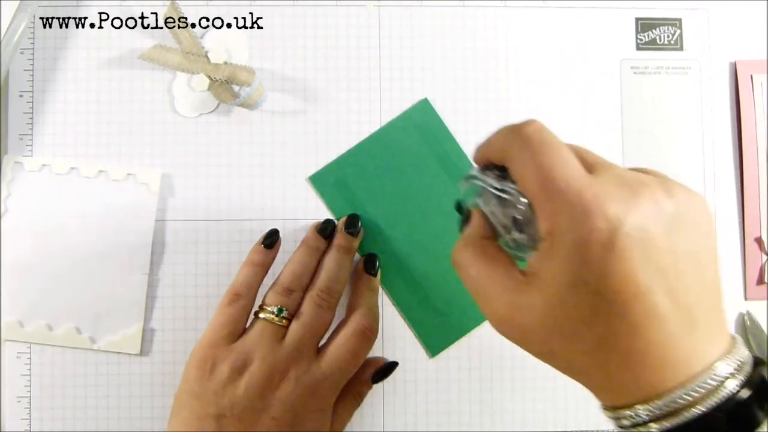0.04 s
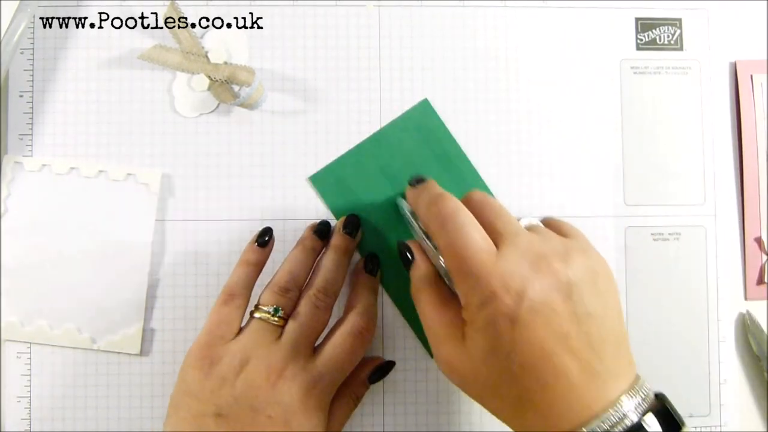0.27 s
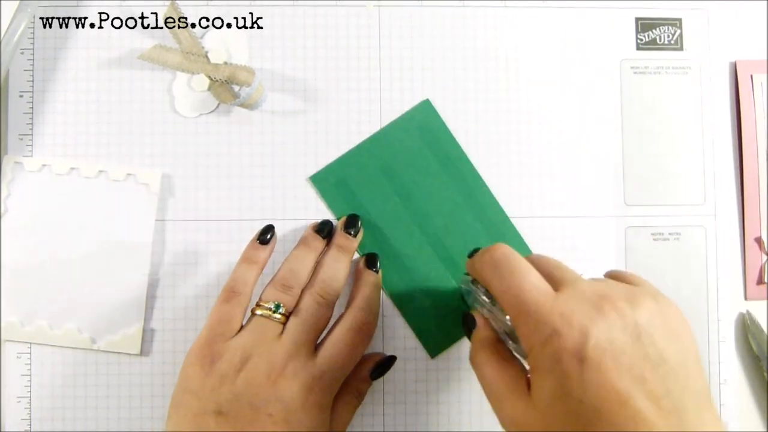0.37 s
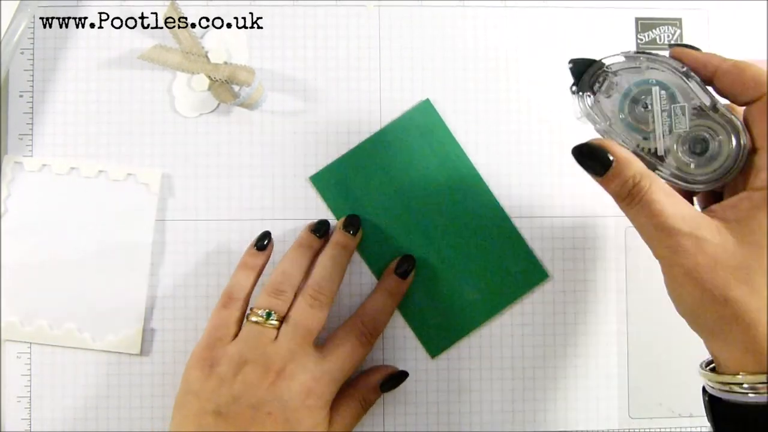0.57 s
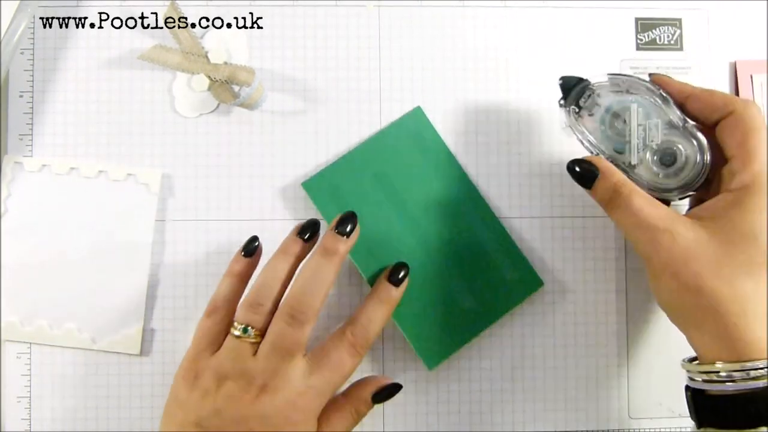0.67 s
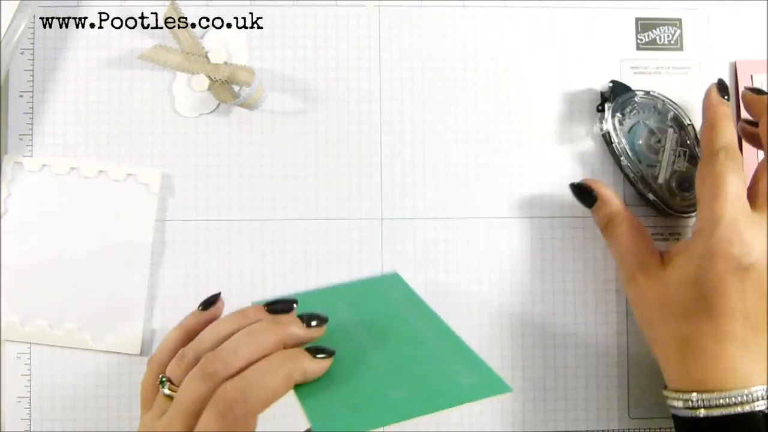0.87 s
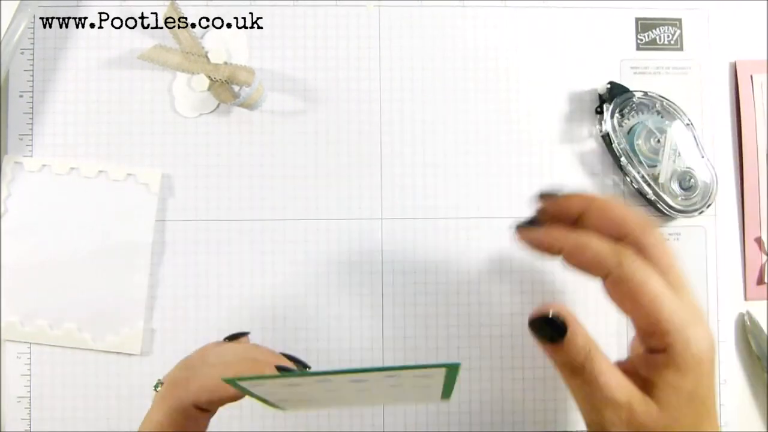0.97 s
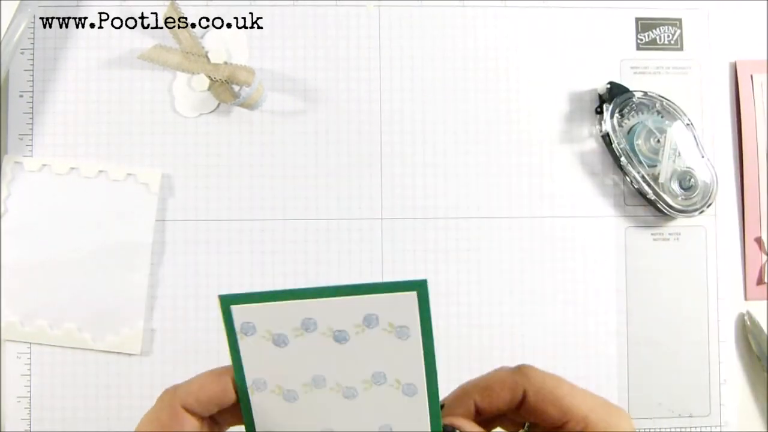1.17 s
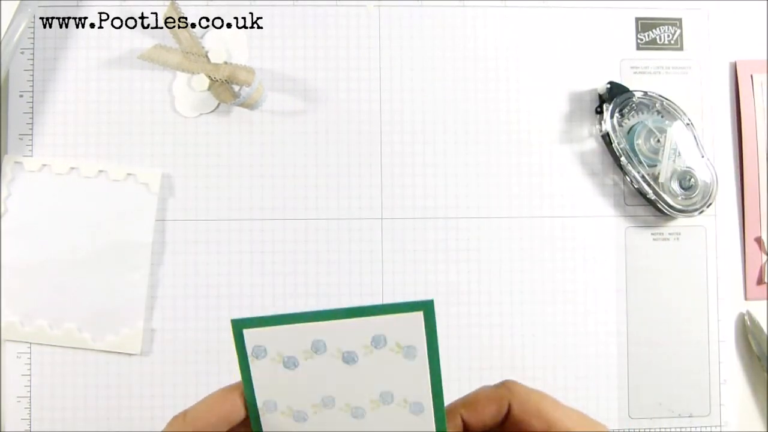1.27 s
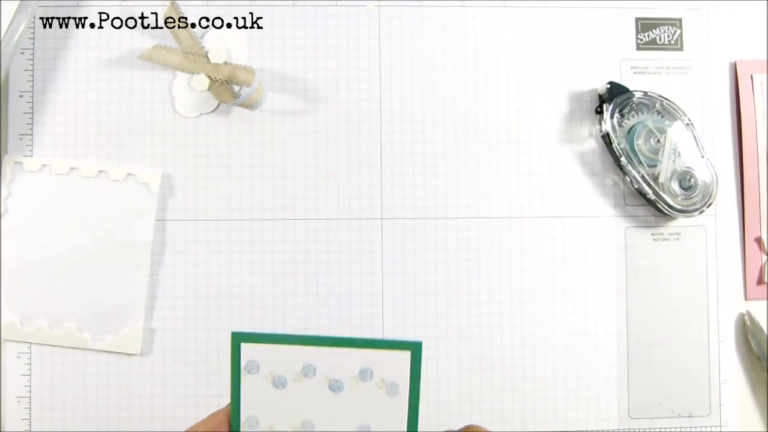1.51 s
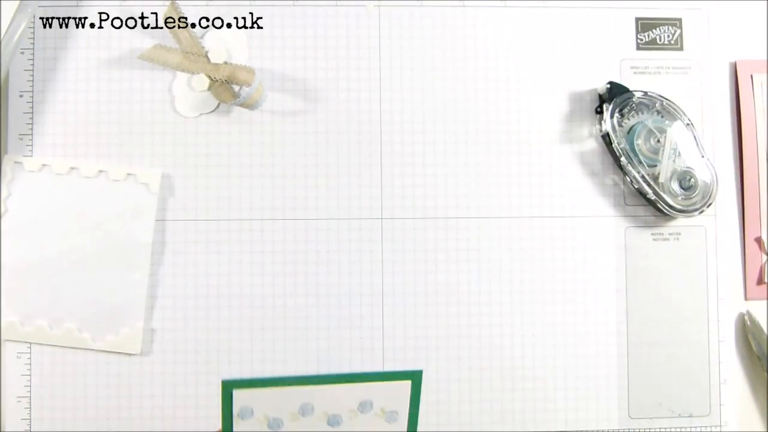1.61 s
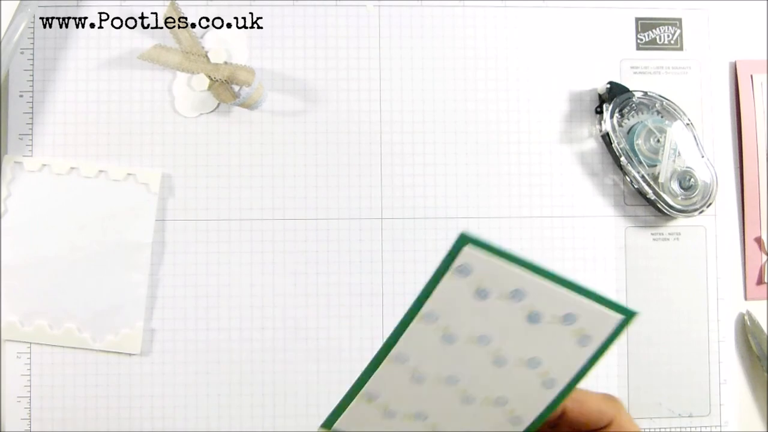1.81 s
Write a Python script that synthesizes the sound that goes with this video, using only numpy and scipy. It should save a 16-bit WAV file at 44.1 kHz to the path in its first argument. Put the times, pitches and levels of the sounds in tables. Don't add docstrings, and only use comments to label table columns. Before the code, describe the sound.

A plastic adhesive tape runner clacks onto card, zips with a short ratcheting buzz, lifts with small clicks and is set down in two hard knocks; then card snaps and rustles, close up in a small room.

```python
import sys
import numpy as np
from scipy import signal
from scipy.fft import rfft, irfft
from scipy.io import wavfile
from scipy.ndimage import uniform_filter1d

SR = 44100
rng = np.random.default_rng(int(sys.argv[2]) if len(sys.argv) > 2 else 0)


def linear_from_db(decibels):
    return 10 ** (np.asarray(decibels, float) / 20)


def wav_out(sig):
    wavfile.write(sys.argv[1], SR, np.round(np.clip(np.atleast_2d(sig).T, -1, 1) * 32767).astype(np.int16))


N = 81585


def unit(x):
    return x / np.sqrt(np.mean(x ** 2))


def band(x, hz, width_hz):
    return signal.lfilter(*signal.iirpeak(min(hz, .45 * SR), hz / width_hz, SR), x)


def grit(spread_db):
    size_db = spread_db * np.minimum(rng.exponential(size=N), 3.5)
    return unit(rng.standard_normal(N) * linear_from_db(size_db))


def decay(start, t60, rise=1e-5):
    since = np.arange(N) / SR - start
    fall = np.exp(-np.log(1000) * np.maximum(since, 0) / max(t60, .002))
    return np.clip(since / rise, 0, 1) * fall


def strike(start):
    return 1. * (np.arange(N) == int(start * SR))


def swell(start, length, power=1):
    t = np.arange(N) / SR
    return np.sin(np.pi * np.clip((t - start) / length, 0, 1) ** power)


def modes(table):
    t = np.arange(N) / SR
    return sum(linear_from_db(db) * np.sin(2 * np.pi * hz * t) * decay(0, t60) for hz, db, t60 in table)


def wide(a, b):
    treble = signal.lfilter(*signal.butter(1, 6600, "high", fs=SR), b)
    mids = signal.lfilter(*signal.butter(3, 930, "high", fs=SR), b)
    side = treble + linear_from_db(-21) * b + linear_from_db(-18.5) * mids
    return np.array([a + side, a - side])


# (frequency [Hz], level [dB per Hz])
HISS_COLOUR = [(18, -41), (30, -4), (355, -6.5), (780, -11.5), (1460, -11.5), (2060, -16.5), (6380, -20),
               (9970, -22.5), (16000, -30)]
# (frequency [Hz], width [Hz], level [dB])
HUMS = [(170.4, 5.8, -69), (107.4, 30, -71.5), (65, 2.7, -70)]
# (time [s], level [dB])
HUM_SWELL = [
    (0, 1.5),
    (.14, 1.5),
    (.2, -2),
    (.9, -10),
    (1.05, 12.5),
    (1.17, 7),
    (1.3, 2),
    (1.5, 8),
    (1.58, -10.5),
    (1.85, -0.5),
]


def tone():
    t, freq = np.arange(N) / SR, np.fft.rfftfreq(N, 1 / SR)
    hz, db = np.array(HISS_COLOUR).T
    shape = linear_from_db(np.interp(np.log(freq + 1), np.log(hz), db))
    side_gain = linear_from_db(np.array([[0], [7.5]]))
    noise = wide(*rng.standard_normal((2, N)) * side_gain)
    hiss = linear_from_db(-59.5) * unit(irfft(rfft(noise) * shape, N))
    hums = []
    for hz, width_hz, db in HUMS:
        waver = unit(band(rng.standard_normal(N), hz, width_hz))
        hums.append(linear_from_db(db) * (np.sin(2 * np.pi * hz * t) + 0.2 * waver))
    swelling = hums[0] * linear_from_db(np.interp(t, *np.array(HUM_SWELL).T))
    return hiss + swelling + sum(hums[1:])


def room(x):
    t = np.arange(SR // 2) / SR
    low_t60_s, high_t60_s, early_s = 0.34, 0.35, 0.011
    tail = wide(*rng.standard_normal((2, len(t))))
    low = signal.lfilter(*signal.butter(1, 3000, fs=SR), tail)
    late = low * np.exp(-np.log(1000) * t / low_t60_s)
    late = late + (tail - low) * np.exp(-np.log(1000) * t / high_t60_s)
    early = wide(*rng.standard_normal((2, len(t))))
    early = early * np.exp(-t / early_s) * np.clip(t / 0.0048, 0, 1)
    answer = linear_from_db(-8) * unit(late) * np.clip(t / 0.05, 0, 1) + linear_from_db(-6.5) * unit(early)
    return signal.fftconvolve(x[None], answer / np.sqrt(len(t)), axes=1)[:, :N]


def ports(x):
    scatter_s, scatter_db, shift_hz = .008, -1, 7
    t = np.arange(SR // 30) / SR
    turn = 2 * np.pi * shift_hz * np.arange(N) / SR
    smear = rng.standard_normal((2, len(t))) * np.exp(-t / scatter_s)
    a, b = signal.fftconvolve(x[None], smear / np.linalg.norm(smear[0]), axes=1)[:, :N]
    return wide(x, linear_from_db(scatter_db) * (a * np.cos(turn) + b * np.sin(turn)))


# (time [s], level [dB], push length [s])
THUMPS = [
    (0.189, -31.5, 0.0053),
    (0.324, -32.5, 0.0035),
    (0.389, -38.5, 0.0035),
    (.563, -35, 0.005),
    (0.639, -55, 0.0016),
    (0.747, -39, 0.0033),
    (0.834, -34, 0.0046),
    (0.842, -28, 0.0078),
    (0.916, -44, 0.0042),
]
# (frequency [Hz], level [dB], 60 dB fade [s])
TABLE_MODES = [(87.4, -8, 0.49), (168.5, -1.5, 0.268), (262, 4, 0.11), (378, -14, .06), (72, -8.5, 0.12)]


def table():
    push = 0
    for start, db, length in THUMPS:
        push = push + linear_from_db(db) * swell(start, length) / (length * SR)
    return signal.fftconvolve(push, modes(TABLE_MODES))[:N]


# (time [s], peak level [dB], centre [Hz], 60 dB rattle fade [s])
FLICKS = [
    (1.221, -36.5, 2550, 0.043),
    (1.329, -14.5, 2860, 0.037),
    (1.449, -35, 2260, 0.094),
    (1.562, -26.5, 2315, 0.1),
    (1.588, -38, 2530, 0.055),
]
# (start [s], length [s], level [dB], centre [Hz], width [Hz])
RUBS = [(-.1, 0.17, -58.5, 2200, 3740), (0.228, 0.042, -46.5, 3000, 5900), (0.56, 0.03, -59, 6000, 9000),
        (0.62, 0.041, -63, 1990, 1500), (0.85, 0.083, -53.5, 4000, 3700), (1.07, 0.14, -70.5, 5000, 7860),
        (1.153, 0.084, -62, 2110, 1970), (1.187, 0.068, -60.5, 7940, 5000), (1.189, 0.055, -56, 955, 700),
        (1.348, 0.1, -65.5, 3930, 7900), (1.734, 0.12, -62.5, 8000, 11800)]


def card():
    snap_lag_s, out, rattle = .0015, 0, grit(6.5)
    for start, db, hz, t60 in FLICKS:
        snap = linear_from_db(db + 4) * strike(start + snap_lag_s)
        hit = linear_from_db(db - 11) * rattle * decay(start + snap_lag_s, t60) + snap
        out = out + band(hit, hz, hz * 2.25)
    hiss = grit(5)
    for start, length, db, hz, width_hz in RUBS:
        stroke = np.abs(swell(start, length, 0.64) ** 1.12)
        out = out + linear_from_db(db + 10.5) * band(hiss * stroke, hz, width_hz)
    return out


# (time [s], click level [dB], low sheet level [dB], high sheet level [dB])
TICKS = [(0.2418, -25, -31, -51), (0.5432, -29, -63, -43), (0.5612, -29.5, -46, -40),
         (0.6371, -25, -41, -40), (0.68, -38, -46.5, -48), (0.7453, -12, -40, -28.5),
         (0.7536, -16, -35, -27.5), (0.8353, -22, -32, -23.5), (1.2229, -29, -35, -38.5),
         (1.258, -56, -62, -50), (1.3303, -16.5, -42, -32), (1.3368, -15.5, -41.5, -32),
         (1.451, -47, -40.5, -37.5), (1.546, -58.5, -68, -51), (1.5636, -23, -29, -27),
         (1.5657, -33, -29.5, -36), (1.572, -42, -35, -46), (1.5882, -35, -44, -44.5)]
# (frequency [Hz], level [dB], 60 dB fade [s])
SHEET_LOW = [(388, -7.5, 0.048), (520, -11, 0.034), (900, -6, 0.022), (1055, -7.5, .02), (1430, -11, .03)]
# (frequency [Hz], level [dB], 60 dB fade [s])
SHEET_HIGH = [(1848, -9.5, .02), (2504, -7.5, .02), (2732, -9, .02), (3353, -5, .02), (5270, -13.5, .015)]


def ticks():
    click, low, high = (sum(linear_from_db(row[k]) * strike(row[0]) for row in TICKS) for k in range(1, 4))
    out = linear_from_db(7) * band(click, 6000, 7600)
    out = out + signal.fftconvolve(low, modes(SHEET_LOW))[:N]
    out = out + signal.fftconvolve(high, modes(SHEET_HIGH))[:N]
    return signal.lfilter(*signal.butter(2, 410, "high", fs=SR), out)


RISE_S = 0.0023
# (time [s], level [dB], frequency [Hz], width [Hz], 60 dB shaking fade [s])
RINGS = [(.186, -28.5, 328, 200, 0.068), (1.331, -29, 880, 250, 0.035), (1.564, -26.5, 500, 250, 0.054),
         (0.835, -18, 8200, 1800, 0.054), (0.185, -27, 790, 1400, 0.046), (0.268, -25, 302, 60, 0.11),
         (.31, -16, 254.4, 46.7, 0.067), (.562, -38.5, 780, 292, 0.04), (.637, -45.5, 400, 151, 0.044),
         (.637, -35, 900, 397, 0.024), (.206, -21, 1250, 500, .03), (.241, -16, 1190, 500, 0.019),
         (.251, -26, 1300, 497, 0.024), (.41, -24, 1130, 400, 0.019), (.429, -21.5, 1650, 500, 0.055),
         (.834, -29, 200, 120, 0.069), (.643, -32, 1970, 300, 0.023), (.654, -40, 1980, 300, 0.026),
         (0.573, -42.5, 4550, 496, 0.069), (0.774, -46, 520, 114, 0.038), (1.345, -47.5, 520, 119, 0.41),
         (0.663, -27.5, 2150, 500, 0.016), (0.743, -26.5, 450, 774, 0.16), (0.742, -19, 1800, 200, 0.033),
         (0.745, -11.5, 2070, 198, 0.046), (.834, -20, 414, 710, 0.066), (.835, -14.5, 4910, 800, 0.088),
         (0.908, -30, 4200, 900, .1), (0.983, -32, 2630, 507, 0.035), (0.985, -33, 4260, 704, 0.042),
         (1.047, -32, 2650, 403, 0.036), (1.047, -33.5, 4430, 600, 0.042), (1.2235, -36, 700, 1310, 0.072),
         (1.2218, -29, 2100, 684, 0.032), (1.33, -43, 925, 980, 0.095), (1.333, -21.5, 2380, 900, 0.029),
         (1.45, -36, 1050, 395, .03), (1.451, -37, 2480, 2450, 0.027), (1.563, -29, 1080, 890, 0.069),
         (1.564, -22, 3100, 1300, 0.036)]


def rings():
    shake, out = grit(1), 0
    for start, db, hz, width_hz, t60 in RINGS:
        force = shake * decay(start, t60, RISE_S) + linear_from_db(14) * strike(start)
        ring = band(band(force, hz, 1.01 * width_hz), hz, 1.01 * width_hz)
        out = out + linear_from_db(db) * np.sqrt(SR / 4 / width_hz) * ring / 3
    return out


def patchy():
    k = int(.012 * SR)
    steps = np.repeat(rng.standard_normal(N // k + 1), k)
    return linear_from_db(1.8 * 1.59 * uniform_filter1d(steps, k)[:N])


# (frequency [Hz], width [Hz], level [dB])
CASE = [(1276, 735, 1.5), (1700, 500, 5.5), (3080, 1160, 1.5), (3890, 620, 2.5), (5000, 960, 2.5),
        (6880, 2200, 4), (9000, 2900, 3), (13100, 5300, -2)]


def case(drive, body_drive):
    out = 0
    for k, (hz, width_hz, db) in enumerate(CASE):
        force = patchy() * (body_drive if k < 2 else drive)
        gain = (-1) ** k * linear_from_db(db) * np.sqrt(SR / 4 / width_hz)
        out = out + gain * band(force, hz, width_hz)
    return out / len(CASE)


# (start [s], length [s], level [dB], frequency [Hz], width [Hz])
PRESSES = [
    (0.232, 0.07, 7.5, 3740, 500),
    (0.283, 0.059, -4, 5000, 500),
    (0.288, 0.053, 1.5, 3150, 600),
    (0.302, 0.062, 6.5, 6780, 600),
    (0.338, 0.049, 4, 3680, 497),
    (0.377, 0.044, 0, 2900, 600),
    (.25, 0.082, -7.5, 1330, 351),
    (0.353, 0.034, -7, 1700, 350),
]


def pressed(drive):
    out = 0
    for start, length, db, hz, width_hz in PRESSES:
        gain = linear_from_db(db) * np.sqrt(SR / 4 / width_hz)
        out = out + gain * band(drive * swell(start, length), hz, width_hz)
    return out / len(CASE)


# (time [s], level [dB], ratchet speed [teeth/s], extra hollow body ring [dB])
PULL = [
    (0.242, -26.5, 200, -6),
    (0.257, -25, 167, 1.5),
    (0.292, -16.5, 183, -7),
    (0.328, -15.5, 198, -10),
    (0.36, -18, 205, -9),
    (0.398, -20.5, 242, -5.5),
    (0.43, -24, 182, 0.5),
    (0.451, -41, 250, -11),
]
# (time [s], peak level [dB], body ring [dB], 60 dB rattle fade [s])
KNOCKS = [(0.193, -14, -8.5, 0.16), (0.204, -14, 8.5, 0.029), (0.24, -8, 7.5, 0.021),
          (0.254, -20, -36, 0.07), (0.408, -14.5, 2, 0.091), (0.413, -16, -0.5, 0.073),
          (0.429, -35, -19, 0.026), (0.54, -20, -27, 0.041), (0.546, -26, -44, 0.035),
          (0.561, -38, -23, 0.068), (0.572, -37, -4.5, 0.055), (0.634, -20.5, -21, 0.046),
          (0.643, -34, -3, 0.096), (0.656, -24.5, -25, 0.073), (0.664, -39, 1, 0.019),
          (0.743, -4.5, -11.5, 0.07), (0.751, -17, -15.5, 0.11), (0.771, -14, -25, 0.063),
          (0.832, -25, -15.5, 0.05), (0.835, -3.5, -10, 0.052), (0.905, -29.5, -6, 0.081),
          (0.983, -29.5, -11, 0.071), (1.045, -31.5, -9.5, 0.044)]


def runner():
    t = np.arange(N) / SR
    time, db, speed, body_db = np.array(PULL).T
    gain = linear_from_db(np.interp(t, time, db, left=-120, right=-120))
    teeth_per_s = np.interp(t, time, speed)
    late, uneven = rng.standard_normal((N // 50, 2)).T
    phase = np.cumsum(teeth_per_s) / SR
    phase = phase + .15 * late[phase.astype(int)]
    tooth = np.maximum(phase, 0).astype(int)
    since_s = (phase - tooth) / teeth_per_s
    force = linear_from_db(1.8 * uneven[tooth]) * np.exp(-since_s / .002)
    ratchet = unit(force * rng.standard_normal(N))
    peel = linear_from_db(4) * grit(2)
    drive = gain * (ratchet + peel)
    body = drive * linear_from_db(np.interp(t, time, body_db) + 5.5)
    squeeze, rattle = pressed(drive), grit(4)
    for start, db, body_db, t60 in KNOCKS:
        blow = linear_from_db(9) * strike(start + 0.00106)
        hit = linear_from_db(db - 9) * (decay(start, t60, RISE_S) * rattle + blow)
        drive = drive + hit
        body = body + linear_from_db(body_db + 11) * hit
    roll = linear_from_db(-25.5) * gain * unit(band(rng.standard_normal(N), 278, 250))
    return case(drive, body) + squeeze, roll


def scene():
    buzz, roll = runner()
    near = buzz + card() + rings() + ticks()
    left, right = room(near)
    heard = ports(near + (left + right) / 2 + roll + table())
    side = linear_from_db(-8.5) * (left - right) / 2 - 0.17 * band(near, 1300, 830)
    heard = heard + np.array([side, -side])
    pan_db = -1
    return heard * linear_from_db(np.array([[pan_db], [-pan_db]]) / 2) + tone()


def low_pass(x):
    return signal.sosfilt(signal.butter(12, 16520, fs=SR, output="sos"), x)


def record(dry):
    limit = .4
    mix = limit * np.tanh(dry / limit)
    mix = signal.sosfilt(signal.butter(3, 60, "high", fs=SR, output="sos"), mix)
    mix = signal.sosfilt(signal.butter(8, 14800, fs=SR, output="sos"), mix)
    return low_pass(mix)


dry = scene()
out = record(dry)
wav_out(out)
```